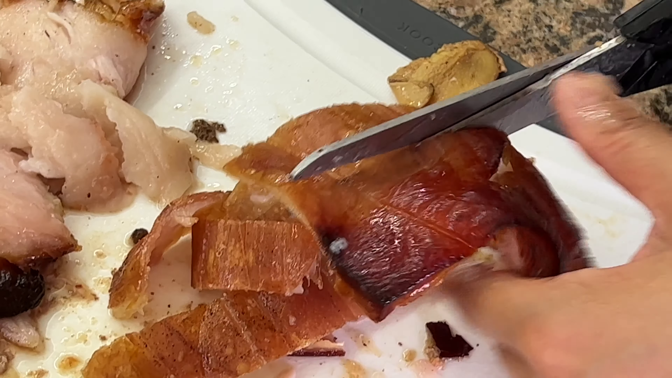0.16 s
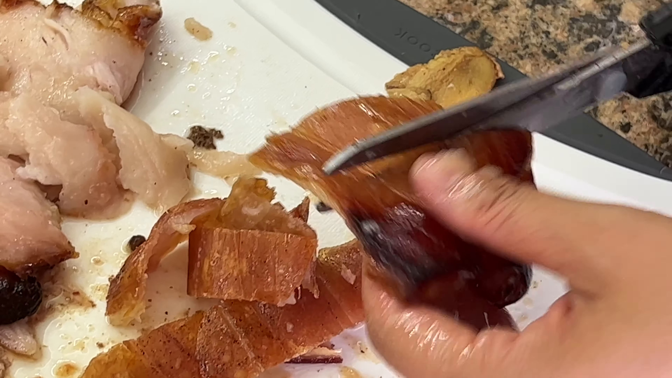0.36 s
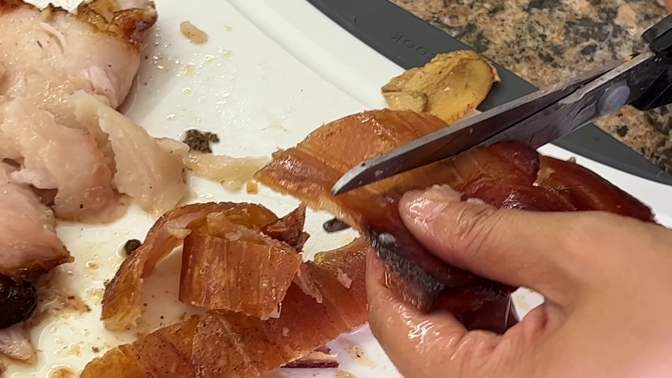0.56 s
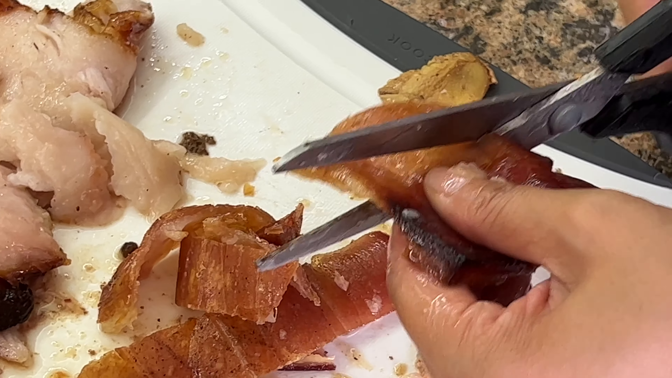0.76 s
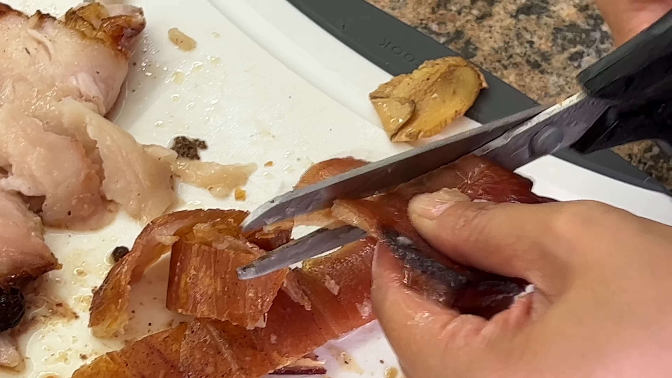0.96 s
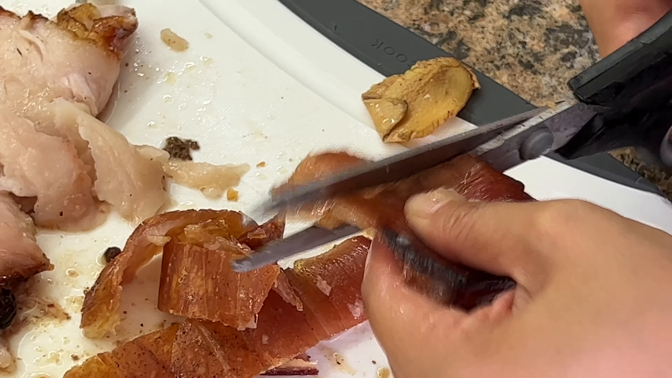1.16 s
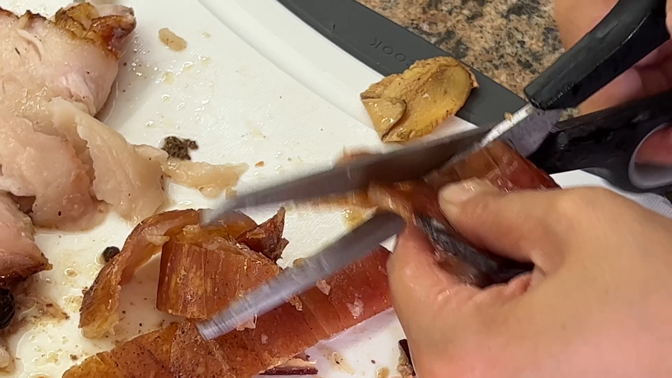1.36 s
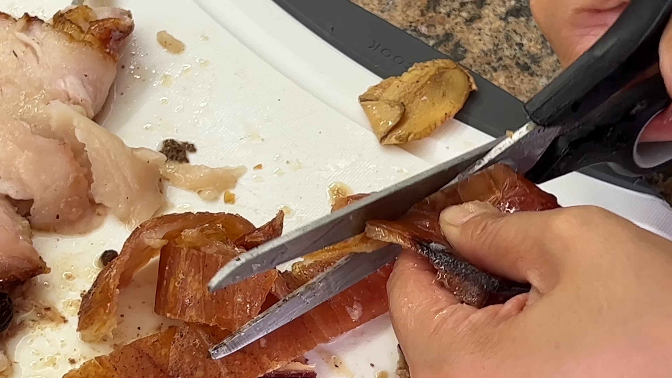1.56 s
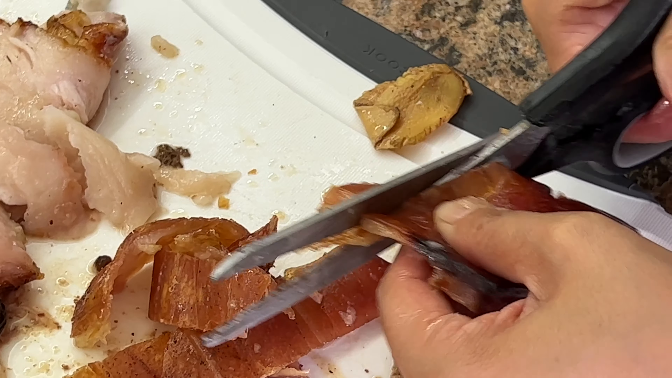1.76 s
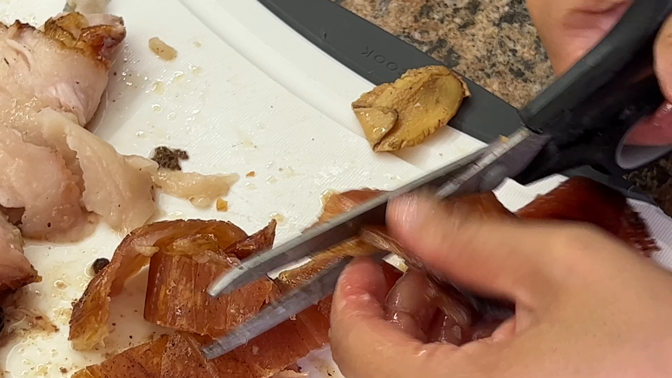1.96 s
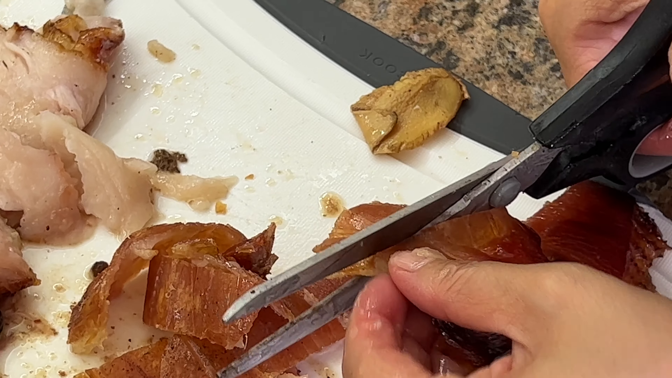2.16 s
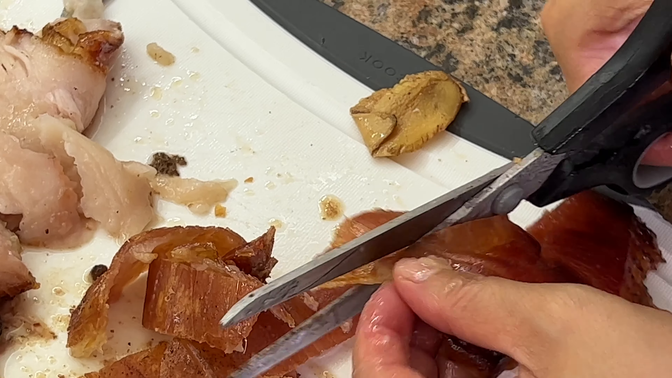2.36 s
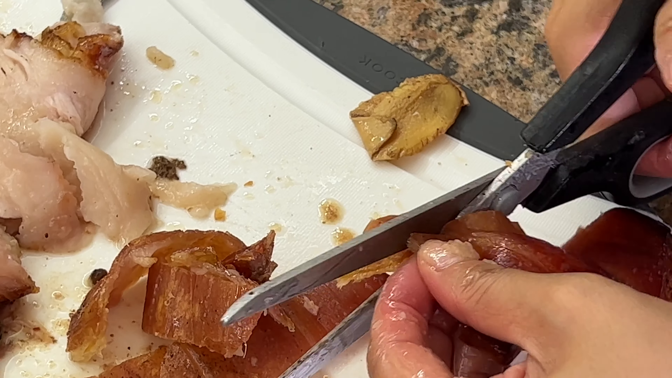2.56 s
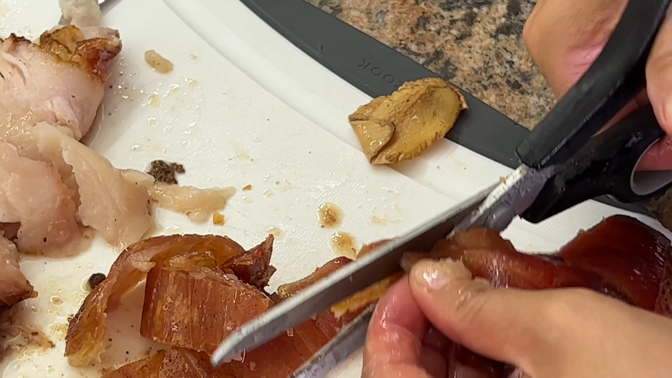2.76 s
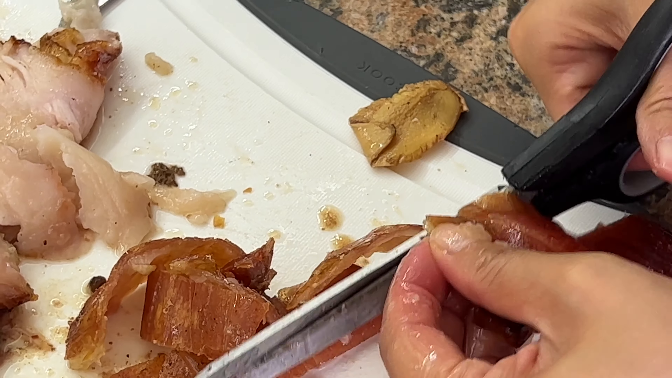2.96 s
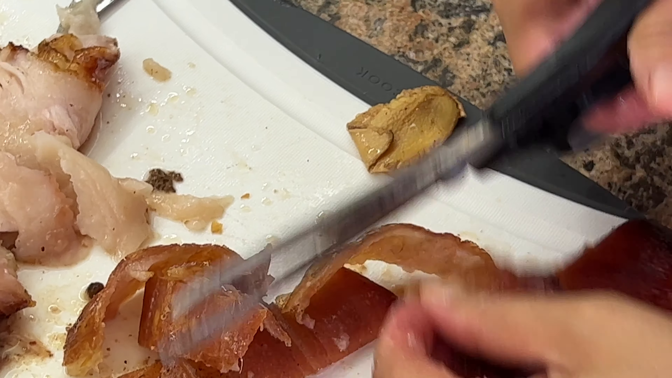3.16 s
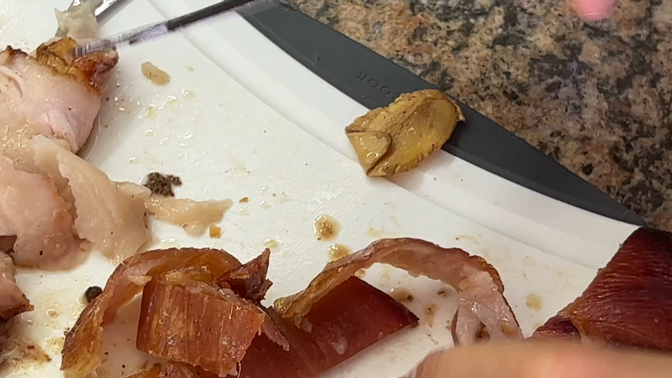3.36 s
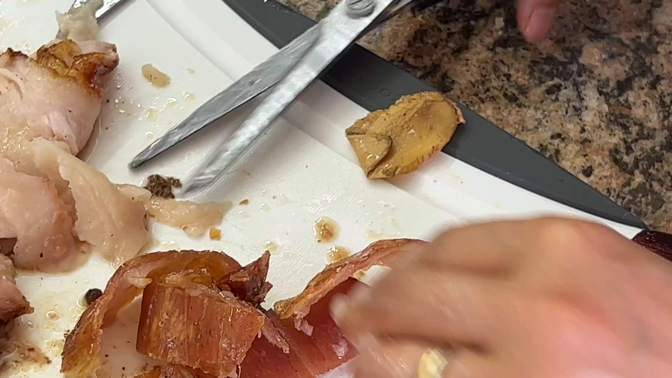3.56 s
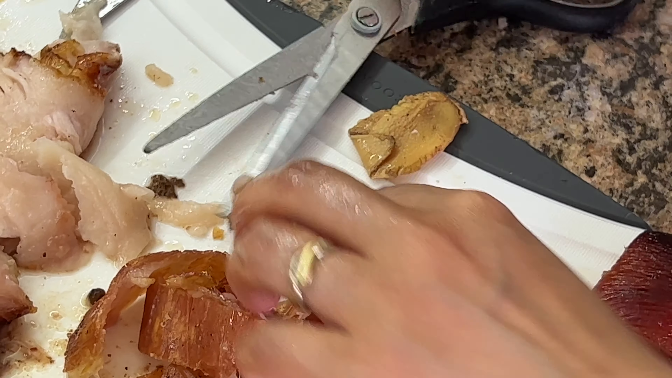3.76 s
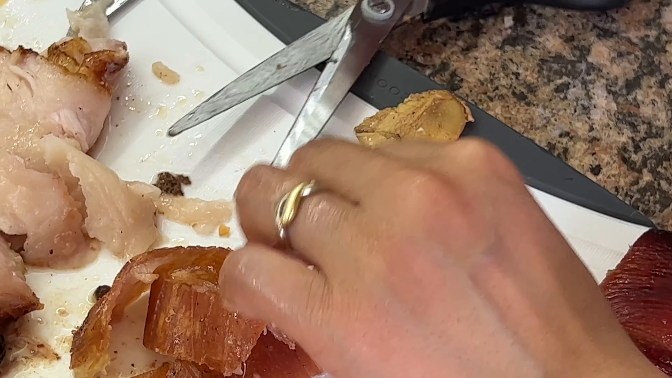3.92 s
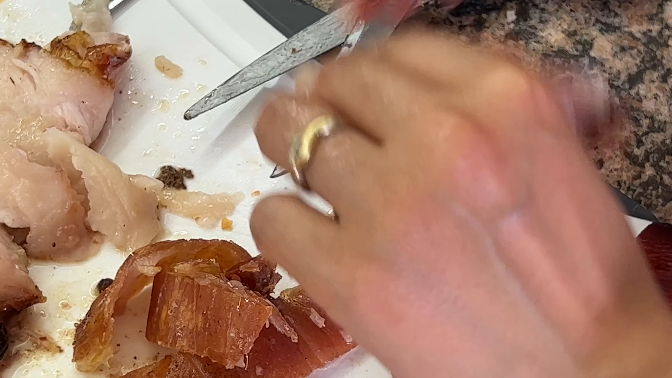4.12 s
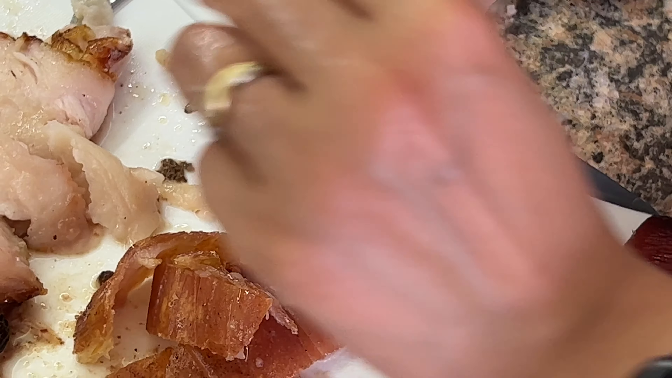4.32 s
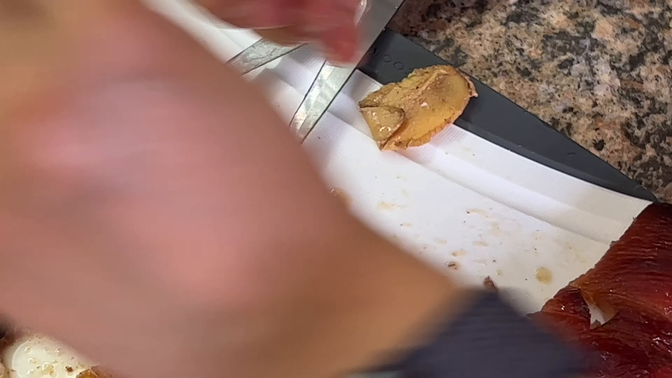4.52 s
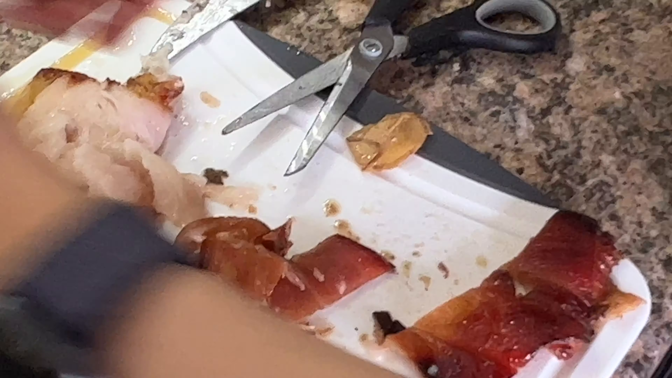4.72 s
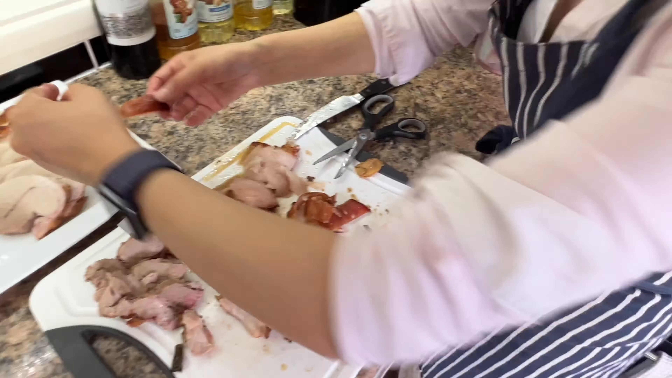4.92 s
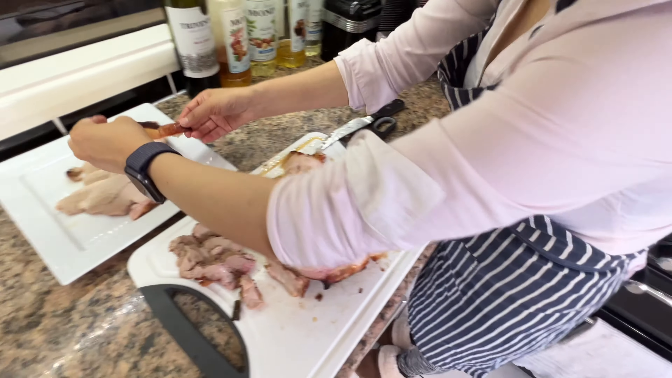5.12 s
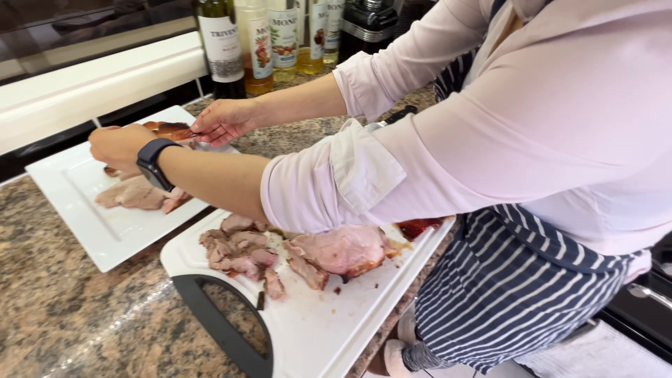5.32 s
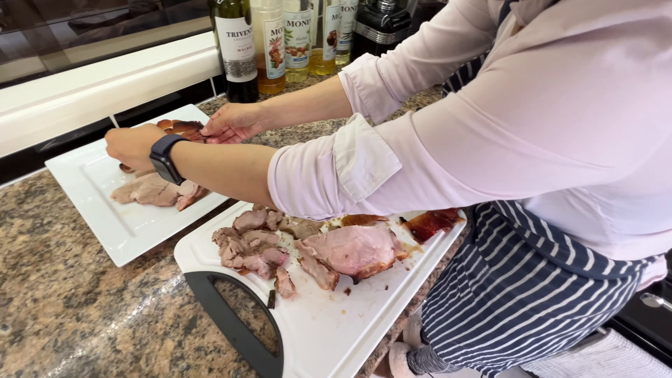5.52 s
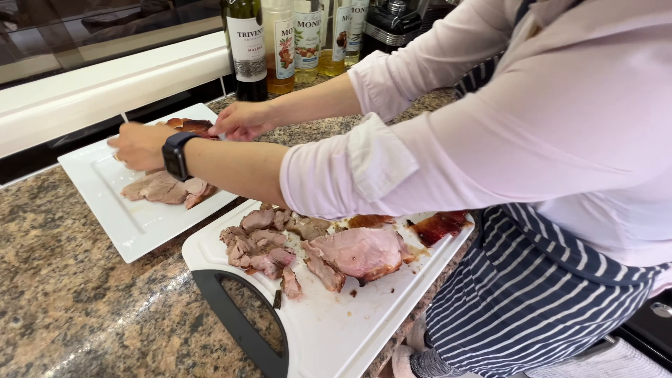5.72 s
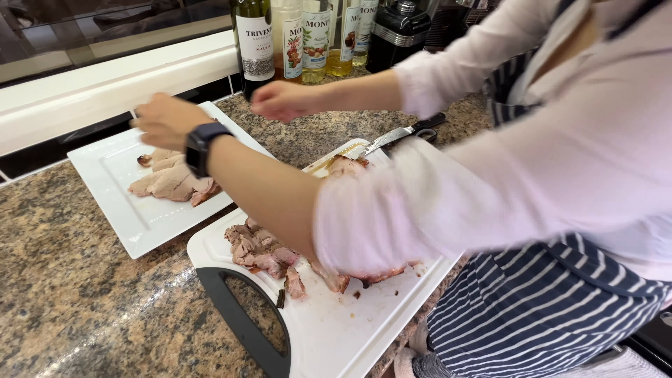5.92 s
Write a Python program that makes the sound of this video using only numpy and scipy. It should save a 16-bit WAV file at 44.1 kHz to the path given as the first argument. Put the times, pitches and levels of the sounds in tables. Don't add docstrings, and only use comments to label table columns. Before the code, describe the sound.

A quiet home kitchen with low room noise, faint appliance hum and light hiss, heard very close. Fingers rustle softly on greasy roasted skin, with faint scuffs from 0 to 0.5 s. A cluster of small dry cracks comes at 0.6 s, then a swelling crackle from 0.83 s breaks into a loud, full crunch at 0.95 s as the blades shut. Lighter snaps and scuffs follow irregularly from 1.2 to 2.6 s, with a clearer crack at 2.66 s. At 2.81 s comes the loudest snap, thin, bright and splintery. Steel scissors tap the plastic board at 3.52 and 3.55 s, handles clack at 3.75 s, and everything falls flat with a rattle and low bump at 3.83 s. Soft rubs and tiny squeaks follow until a dull bump at 4.85 s. From 4.9 s, further back, faint small clicks scatter to the left, clearest at 5.73 s, until about 6 s.

```python
import sys
import numpy as np
from scipy import signal
from scipy.fft import rfft, irfft, next_fast_len
from scipy.io import wavfile
from scipy.ndimage import uniform_filter1d, map_coordinates

SR = 44100
rng = np.random.default_rng(int(sys.argv[2]) if len(sys.argv) > 2 else 0)


def magnitude_from_level(level_db):
    exponent = np.asarray(level_db, float) / 20
    return 10 ** exponent


def bounce(signal):
    frames = np.transpose(np.atleast_2d(signal))
    limited = np.clip(frames, -1, 1)
    pcm = np.round(limited * 32767).astype(np.int16)
    wavfile.write(sys.argv[1], SR, pcm)


N = 268105

# f/Hz, density/dB per Hz
AIR_SPECTRUM = [(18, -30.5), (30, -9), (45, -5.5), (80, -5.5), (257, -10), (467, -19.5), (526, -17),
                (932, -20.5), (1540, -38), (1950, -39.5), (2730, -37), (4000, -53.5), (5200, -52.5),
                (5720, -51), (9000, -59.5), (11700, -93), (19800, -120)]
# f/Hz, likeness
AIR_LIKENESS = [(60, 1), (130, 0.56), (290, 0.8), (640, 0.076), (1410, 0.4), (3100, 1), (6820, 0.94),
                (15000, 0.1397)]
# f/Hz, left minus right/dB
AIR_LEAN = [(60, 6.5), (180, 0.5), (550, 1.5), (1650, 1), (4970, -4.5), (15000, -1)]
# f/Hz, width/Hz, level/dB
HUM = [(58.7, 0.74, -59.5), (48.5, .6, -64), (110.94, 6.6, -61.5), (267.3, 37, -68), (461.6, 29, -72)]
# f/Hz, density/dB per Hz
HISS = [(4000, -12), (6500, -0.5), (9000, 2.5), (12800, -3.5), (13800, -13.5), (15400, -11.5),
        (16300, -20.5)]
# t/s, effort/dB, dryness (-1 greasy, dull .. 1 dry, bright)
RUSTLE = [(0.0, -69, 0.05), (0.22, -76, 0.05), (0.69, -76, 0.05), (0.91, -78.5, 0.05), (1.03, -67, 0.05),
          (1.61, -75.5, 0.05), (2.37, -70.5, 0.05), (2.57, -68.5, 0.05), (2.81, -70.5, 0.05),
          (3.3, -74.5, 0.05), (3.56, -69.5, 0.05), (3.71, -69.5, 0.05), (3.77, -52, 0.05),
          (4.08, -70, 0.05), (4.37, -73.5, 0.05), (4.64, -64.5, 0.05), (5.49, -72.5, 0.05),
          (6.08, -69.5, 0.05)]
# low f/Hz, high f/Hz, level/dB, share of effort followed, dB per unit dryness
RUSTLE_BANDS = [(1110, 4100, -71, 1.3, -9.5), (3000, 6520, -78.5, 1.2, 4), (6000, 12000, -85, 0.4, 7.5),
                (9680, 16000, -88.5, 0.45, 9)]
# start t/s, end t/s
PAUSES = [
    (.74, .81),
    (1.64, 1.73),
    (2.19, 2.28),
    (3.39, 3.46),
]
# t/s, peak level/dB,
# f/Hz, t60/s
SCUFFS = [(0.0, -60.5, 2920, 0.15), (.039, -53, 5500, 0.25), (.404, -57.5, 3100, 0.3),
          (.424, -63, 7000, 0.091), (.51, -67, 4240, 0.14), (1.44, -49, 7700, 0.16),
          (1.556, -58.5, 5160, 0.28), (1.625, -61, 4950, 0.29), (1.74, -57, 7460, 0.19),
          (1.742, -63, 5400, 0.27), (1.845, -62.5, 7300, 0.055), (1.995, -60.5, 3880, 0.3),
          (1.997, -59.5, 6000, 0.42), (2.82, -48, 6600, 0.32), (3.175, -57, 5030, 0.16),
          (3.175, -59.5, 6290, 0.084), (3.194, -58, 2930, 0.85), (4.365, -58, 3650, 0.24),
          (4.39, -63, 6400, 0.024), (4.45, -56.5, 3200, 0.33), (4.58, -60, 4230, 0.31)]
# t/s, peak level/dB, f/Hz, t60/s
RUBS = [(.135, -53.5, 3280, 0.44), (.599, -51, 1946, 0.018), (.615, -56, 5340, 0.22),
        (.65, -49.5, 3740, 0.1), (.69, -58.5, 2894, 0.25), (.834, -45, 6500, 0.12), (.855, -49, 5580, .15),
        (.875, -42, 4500, 0.1), (.895, -52, 4440, 0.4), (1.15, -54, 6900, 0.34), (1.172, -48.5, 2400, 0.34),
        (2.3, -56.5, 4710, 0.2), (2.402, -50.5, 1940, 0.89), (2.44, -54.5, 6200, 0.22),
        (2.635, -64, 6150, 0.034), (3.3, -50.5, 2060, 0.21), (3.872, -26.5, 2220, 0.15),
        (4.41, -53.5, 3000, 0.47), (4.52, -70, 4160, 0.39), (4.62, -71, 2480, 0.47),
        (4.75, -49.5, 1680, 0.055)]
# t/s, peak level/dB, f/Hz, t60/s, thickness as body level below 3.5 kHz/dB
CRACKS = [(.0865, -45, 8800, 0.035, -13), (.6122, -37, 1700, 0.013, 8), (.615, -42.5, 1600, 0.02, -4),
          (.6262, -42.5, 1785, .012, 1), (.6283, -44, 1820, 0.05, -5), (.6393, -38.5, 1708, 0.011, -6),
          (.643, -48.5, 1690, 0.051, -6), (.646, -48.5, 3850, .03, -1), (.667, -48.5, 1787, 0.035, 4),
          (.833, -33, 7000, 0.011, -9), (.8498, -24.5, 6970, 0.028, -5.5), (.8878, -18, 6850, 0.027, -5.5),
          (.891, -26.5, 7000, .04, -20), (1.2143, -35.5, 6800, 0.038, 4.5),
          (1.3314, -35.5, 4850, 0.0055, -6.5), (1.334, -40, 7900, 0.038, -17),
          (1.394, -38.5, 7340, 0.02, 2.5), (1.3999, -34.5, 7600, 0.037, -22), (1.518, -50, 7500, 0.036, -3),
          (1.8135, -49.5, 1720, 0.051, -2.5), (2.0572, -49.5, 5660, 0.088, -1),
          (2.0867, -56, 5450, 0.03, -5), (2.1018, -46, 5400, 0.049, -7), (2.171, -52.5, 5200, 0.052, 0),
          (2.4304, -43.5, 2200, 0.0055, 0), (2.439, -48, 2100, 0.053, -2), (2.5303, -40.5, 6000, 0.0087, 7),
          (2.619, -66.5, 6500, 0.013, -20), (2.63, -63, 6400, 0.017, -16), (2.6625, -30, 5900, 0.02, -9.5),
          (2.7454, -51, 4504, .02, -7), (3.0706, -52, 7460, 0.023, 8), (3.465, -58, 8130, 0.013, -8.5),
          (3.6794, -36.5, 5390, 0.031, -11)]
# t/s, peak level/dB, f/Hz, t60/s, thickness/dB
BITES = [(.857, -32.5, 7550, 0.013, -16), (.867, -35, 6500, 0.0093, -11.5), (.87, -22, 7050, 0.0068, -7.5),
         (.873, -35.5, 7500, .02, -19), (.9437, -14.5, 6000, 0.02, -7), (.9455, -24, 1730, .015, 3.5),
         (.9466, -8.5, 7400, 0.005, 8), (.9474, -14, 7400, .02, -7), (.9495, -17.5, 7430, .035, 5.5),
         (.956, -28.5, 6000, 0.018, -3), (2.6655, -31, 5900, 0.011, -12.5), (2.7765, -51, 6800, 0.02, -22),
         (2.788, -41, 7000, .12, -21.5), (2.789, -47, 4045, 0.012, -9.5), (2.8056, -20, 6750, 0.0081, -21),
         (2.8063, -8.5, 7050, 0.0074, -19.5), (2.8088, -17, 7000, 0.006, -24.5),
         (2.811, -17.5, 7600, .005, -20.5), (2.8118, -1.5, 6400, 0.004, -25),
         (2.8124, -13.5, 11200, .012, -20), (2.8131, -6.5, 6900, 0.004, -24.5),
         (2.8145, -25.5, 2080, 0.026, -8), (2.8152, -9.5, 7900, 0.015, -21.5),
         (2.8165, -16.5, 9100, .01, -19.5), (2.818, -14, 6386, .012, -18.5), (2.888, -36.5, 6600, 0.02, 0),
         (4.851, -49, 1500, 0.018, 7)]
# t/s, peak level/dB, f/Hz, t60/s
FAR_CLICKS = [(4.904, -51, 6000, 0.023), (4.97, -51, 8500, 0.024), (5.053, -47, 6000, 0.024),
              (5.2205, -46, 4500, 0.011), (5.221, -47, 3200, .03), (5.2215, -50, 5590, 0.01),
              (5.226, -53.5, 1400, .12), (5.278, -47, 3436, 0.047), (5.391, -54, 6870, 0.014),
              (5.395, -56, 2260, 0.16), (5.495, -55, 6000, 0.025), (5.654, -54.5, 1703, 0.15),
              (5.689, -59, 4660, 0.024), (5.73, -39.5, 3200, 0.033), (5.731, -45.5, 3810, 0.015),
              (5.737, -50.5, 1250, 0.08), (5.869, -56.5, 4300, 0.16), (5.96, -47.5, 4600, 0.0094),
              (5.98, -46.5, 6000, 0.017), (5.996, -46.5, 6580, 0.036)]
# body level/dB, body slope/dB per octave, fizz level/dB, fizz slope/dB per octave
CRACK_TONE = (1, -3.5, -15.5, 11)
BITE_TONE = (-3, 0, -16, 10.5)
FAR_TONE = (-3, -3, -46, 9)
SCUFF_TONE = (-22.5, -20.5, -25, 0.5)
RUB_TONE = (-0.5, -12, -22.5, 3)
# t/s, peak level/dB, scrape t60/s
SHUTS = [
    (.9468, -24, 0.026),
    (2.8138, -16.5, 0.014),
    (2.825, -31.5, 0.13),
]
# t/s, peak level/dB, scrape t60/s
TIP_KNOCKS = [
    (3.5188, -11, 0.007),
    (3.5215, -21, 0.037),
    (3.5512, -17.5, 0.009),
    (3.554, -27.5, 0.035),
    (3.5645, -41.5, 0.025),
]
HANDLE_KNOCKS = [
    (3.7458, -13.5, 0.019),
    (3.7472, -12, 0.025),
    (3.7492, -22, 0.0043),
    (3.7508, -23.5, 0.024),
    (3.755, -24.5, 0.038),
]
SETTLE_KNOCKS = [
    (3.8256, -10, 0.01),
    (3.8272, -16.5, 0.019),
    (3.8292, -14, 0.016),
    (3.832, -20, 0.071),
    (3.8672, -23, 0.06),
    (3.8705, -44.5, 0.056),
    (3.8800, -38, 0.014),
    (3.912, -45.5, 0.0095),
]
# f/Hz, width/Hz, level/dB
BLADE_MODES = [(704, 230, -19.5), (2000, 230, -6), (3700, 180, -11), (6360, 110, -0.5), (6560, 160, 4),
               (7300, 120, -5), (8060, 310, -4.5)]
TIP_MODES = [(500, 140, -7), (1050, 234, 7), (1600, 770, 1), (2170, 590, 1), (3200, 440, -2.5),
             (4210, 400, -2.5), (5200, 330, -5), (7400, 760, -13), (8370, 470, -10)]
HANDLE_MODES = [(365.4, 36, 12.5), (875, 160, 5.5), (1400, 540, -2.5), (2090, 390, 7), (3000, 290, 3.5),
                (3650, 830, 3.5), (5800, 370, 0), (7230, 1600, -3), (9100, 1400, -6.5), (11200, 280, -16)]
SETTLE_MODES = [(400, 21, 6), (990, 170, 1.5), (1740, 190, 1), (2434, 410, 4.5), (3724, 530, -8.5),
                (5450, 400, 0), (6200, 500, -2), (7400, 960, -4.5), (8580, 800, -13)]
# t/s, peak level/dB, f/Hz, t60/s
THUDS = [(1.22, -34.5, 292, 0.096), (1.222, -31.5, 105, 0.081), (1.251, -40, 136, 0.24),
         (3.526, -34, 125.3, 0.28), (3.528, -39.5, 305, 0.35), (3.553, -35, 122, 0.29),
         (3.681, -34.5, 155, 0.39), (3.71, -38, 99, 1), (3.753, -45, 200, 0.4), (3.853, -28, 341, 0.24),
         (3.856, -26, 129, 0.064), (3.863, -27, 77, 0.17), (3.875, -26.5, 121, 0.17),
         (3.892, -33, 150, 0.051), (3.908, -31.5, 115, 0.33), (3.945, -51, 90, 0.064),
         (4.851, -33.5, 308, 0.12), (4.852, -35.5, 415, 0.079), (4.855, -40.5, 574, 0.16)]
# start t/s, length/s, start f/Hz, end f/Hz, level/dB
SQUEAKS = [(1.23, .096, 5350, 5400, -76), (3.076, .012, 12200, 11950, -70), (3.5, 0.018, 5130, 5170, -69),
           (3.505, .013, 7900, 7600, -71), (4.054, 0.06, 3200, 3200, -73), (4.056, 0.11, 6050, 5950, -78),
           (4.161, 0.063, 2980, 2850, -74), (4.165, .07, 3250, 3250, -77), (4.26, 0.08, 2450, 2400, -77),
           (4.615, 0.103, 6900, 8400, -82), (4.67, 0.043, 11250, 12750, -82), (4.73, .022, 2300, 2400, -69),
           (4.77, 0.057, 9410, 9150, -77), (4.808, 0.086, 13000, 11200, -78)]
# f/Hz, t60/s
WALLS = [(300, 0.46), (1000, 0.43), (3000, .32), (6500, 0.34), (9000, 0.3), (12000, 0.26), (16000, 0.12)]
# f/Hz, left minus right/dB
NEAR_LEAN = [(60, 2), (180, 3), (700, 2.5), (1250, 4), (1900, 1.2), (2600, -.3), (15000, -.3)]
# f/Hz, turns
PORT_SLIP = [(8500, 0), (10200, .5), (12100, 1), (13800, 1.5), (15500, 2)]
# f/Hz, left lead/rad
DIRECT_SKEW = [(700, 0.1), (1250, -.1), (1900, -.25), (2600, .45), (3500, .68), (5000, 0.33), (8000, 0.28),
               (12000, .15)]
# f/Hz, left minus right/dB
FAR_LEAN = [(700, 3), (2600, 5), (5500, 11), (7500, 7), (8500, 0), (9600, -9), (10600, -6), (11500, 0)]
# f/Hz, half width/Hz, level/dB
TREBLE_DIPS = [(10310, 87, -4), (14100, 410, -2), (12580, 1500, -2.5)]

SCENE_CHANGE_S = 4.878
AIR_DB = -57
USUAL_EFFORT_DB, PAUSE_DB, PAUSE_EASE_S = -70, -10.5, 0.027
MIDDLE_HZ = 4000
TIP_FIZZ_DB, HANDLE_FIZZ_DB = -19, -24
THUD_DAMPING = 0.56
BLUR_HZ = 160
SLIP_DWELL = 0.9
SWAY_SAMPLES, SWAY_SPAN = 1.8, 200
SHARED_ABOVE_HZ = 11200
TOP_HZ = 15780


def evened(x):
    return x / np.sqrt(np.mean(x ** 2) + 1e-20)


def read(points, hz):
    f, value = np.transpose(points)
    return np.interp(np.log(hz + 1), np.log(f + 1), value)


def add(mix, s, sound):
    part = mix[round(s * SR):][:len(sound)]
    part += sound[:len(part)]


def resonate(x, hz, width_hz):
    turn = np.exp(2j * np.pi * np.cumsum(hz * np.ones(len(x))) / SR)
    r = np.exp(-np.pi * width_hz / SR)
    return 2 * (turn * signal.lfilter([1 - r], [1, -r], x / turn)).real


def band(x, low_hz, high_hz):
    sos = signal.butter(2, [low_hz, min(high_hz, SR / 2.2)], "band", fs=SR, output="sos")
    return signal.sosfilt(sos, x)


def kitchen_air():
    frames, hz = N // 512 + 5, np.fft.rfftfreq(2048, 1 / SR)
    a, b, c, d = rng.standard_normal((frames, 1025, 4)).T
    same = np.clip(read(AIR_LIKENESS, hz), -1, 1)[:, None]
    left = a + 1j * b
    right = same * left + np.sqrt(1 - same ** 2) * (c + 1j * d)
    level_db = read(AIR_SPECTRUM, hz) + np.outer([.5, -.5], read(AIR_LEAN, hz))
    z = np.array([left, right]) * magnitude_from_level(level_db)[:, :, None]
    air = magnitude_from_level(AIR_DB) * evened(signal.istft(z, nperseg=2048, noverlap=1536)[1][:, :N])
    drive = rng.standard_normal(N + 2 * SR)
    for hum_hz, width_hz, db in HUM:
        hum = resonate(resonate(drive, hum_hz, width_hz), hum_hz, width_hz)[-N:]
        air = air + magnitude_from_level(db) * evened(hum)
    return air


def hiss():
    size = next_fast_len(N)
    shape = magnitude_from_level(read([(20, -60), (2000, -47.5)] + HISS, np.fft.rfftfreq(size, 1 / SR)))
    return evened(irfft(rfft(rng.standard_normal((size, 2)).T) * shape, size)[:, :N])


def rustle():
    s, effort_db, dryness = np.transpose(RUSTLE)
    grains = rng.standard_normal((2, N))
    flutter = evened(uniform_filter1d(rng.standard_normal(N), size=130))
    z = signal.stft(grains * magnitude_from_level(1.3 * flutter), nperseg=256)[2]
    patches = uniform_filter1d(rng.standard_normal(z[0].T.shape), size=24, axis=0)
    patches = uniform_filter1d(patches, size=4, axis=1)
    grains = signal.istft(z * magnitude_from_level(2.8 * evened(patches).T), nperseg=256)[1][:, :N]
    t = np.arange(N) / SR
    push_db = np.interp(t, s, effort_db - USUAL_EFFORT_DB)
    dry = np.interp(t, s, dryness)
    still = np.zeros(N)
    for start, end in PAUSES:
        still += np.clip(np.minimum(t - start, end - t) / PAUSE_EASE_S + 1, 0, 1)
    out = np.zeros((2, N))
    for low_hz, high_hz, db, share, dry_db in RUSTLE_BANDS:
        out += magnitude_from_level(db + share * push_db + dry_db * dry) * evened(band(grains, low_hz, high_hz))
    return magnitude_from_level(PAUSE_DB * still) * out


def splinters(t60, chance, rise_s, first, spiky_db=2.0):
    t = np.arange(len(chance)) / SR
    size = magnitude_from_level(spiky_db * evened(uniform_filter1d(chance[::-1], size=24)))
    spray = chance * size * (1 - np.exp(-t / rise_s)) * magnitude_from_level(-60 * t / t60)
    return spray + first * signal.unit_impulse(len(t), round(rise_s * SR))


def cracks(rows, tone, wide_db, damping, rise_s, body_top_hz, first):
    out = np.zeros((2, N))
    for (s, db, hz, t60, *thick_db), chance in zip(rows, rng.standard_normal((len(rows), 6000))):
        octaves = np.log2(hz / MIDDLE_HZ)
        body_db = tone[0] + tone[1] * octaves + sum(thick_db)
        fizz_db = tone[2] + tone[3] * octaves + 8
        spray = splinters(t60, chance, rise_s, first)
        ring = resonate(resonate(spray, hz, damping * hz), hz, damping * hz)
        snap = evened(ring) + magnitude_from_level(body_db) * evened(band(spray, 1000, body_top_hz))
        snap += magnitude_from_level(wide_db) * evened(band(spray, 3200, 7500))
        snap += magnitude_from_level(fizz_db) * evened(band(spray, 5800, 14000))
        for port, lean_db in zip(out, (.6 * chance[-1], -.6 * chance[-1])):
            add(port, s, magnitude_from_level(db + lean_db) * snap / abs(snap).max())
    return out


def knocks(rows, modes, fizz_db, first):
    out = np.zeros(N)
    for (s, db, t60), chance in zip(rows, rng.standard_normal((len(rows), 4096))):
        blow = splinters(t60, chance, .0006, first)
        ring = np.zeros(len(blow))
        for k, (hz, width_hz, mode_db) in enumerate(modes):
            ring += (-1) ** k * magnitude_from_level(mode_db) * resonate(blow, hz, width_hz)
        body = band(evened(ring) + magnitude_from_level(-9) * evened(band(blow, 490, 10500)), 210, 12600)
        hit = body + magnitude_from_level(fizz_db + 2.5 * (db + 7.5)) * evened(band(blow, 12000, 23000))
        add(out, s, magnitude_from_level(db) * hit / abs(hit).max())
    return out


def thuds():
    out, t = np.zeros(N), np.arange(9000) / SR
    for (s, db, hz, t60), chance in zip(THUDS, rng.standard_normal((len(THUDS), len(t)))):
        push = 3.67 * np.exp(-t / 0.0012) + chance * magnitude_from_level(-60 * t / t60)
        push *= 1 - np.exp(-t / 0.0035)
        ring = band(resonate(push, hz, THUD_DAMPING * hz), 0.5 * hz, 1.67 * hz)
        add(out, s, magnitude_from_level(db) * ring / abs(ring).max())
    return out


def squeaks():
    out = np.zeros(N)
    for start, length, from_hz, to_hz, db in SQUEAKS:
        hz = np.linspace(from_hz, to_hz, round(length * SR))
        drive = rng.standard_normal(9000)[:len(hz)]
        tone = evened(resonate(resonate(drive, hz, BLUR_HZ), hz, BLUR_HZ))
        add(out, start, magnitude_from_level(db) * tone * signal.windows.tukey(len(hz), .4))
    return out


def walls(x, apart=1.4, apart_top_hz=1500):
    taps = np.zeros((2, SR // 2))
    at = np.arange(200, SR // 2 - 20, 10)
    at = at + rng.integers(0, 10, (2, len(at)))
    np.put_along_axis(taps, at, rng.choice([-1., 1.], at.shape), axis=1)
    hz, t, z = signal.stft(taps, SR, nperseg=256)
    same, other = signal.istft(z * magnitude_from_level(-60 * t / read(WALLS, hz)[:, None]), SR, nperseg=256)[1]
    other = band(other, 400, apart_top_hz)
    other = apart * band(band(other, 100, apart_top_hz), 100, apart_top_hz)
    tail = np.array([same + other, same - other]) / np.linalg.norm(same)
    return signal.fftconvolve(np.atleast_2d(x).mean(0)[None], tail, axes=1)[:, :N]


def sway(x):
    wander = uniform_filter1d(rng.standard_normal(N), size=SWAY_SPAN)
    wander = evened(uniform_filter1d(wander, size=SWAY_SPAN))
    at = np.arange(N) + SWAY_SAMPLES * wander
    return np.array([map_coordinates(port, [at], order=2) for port in x])


def near_ports(x, direct):
    size = next_fast_len(N)
    hz = np.fft.rfftfreq(size, 1 / SR)
    slip = 2 * np.pi * read(PORT_SLIP, hz)
    slip -= SLIP_DWELL * np.sin(2 * slip) / 2
    ports = magnitude_from_level(np.outer([.5, -.5], read(NEAR_LEAN, hz))) * np.exp(np.outer([-.5j, .5j], slip))
    skew = np.exp(np.outer([.5j, -.5j], read(DIRECT_SKEW, hz)))
    return irfft((rfft(x, size) + rfft(direct, size) * skew) * ports, size)[:, :N]


def dip(x, hz, width_hz, db):
    size = next_fast_len(N)
    offset = (np.fft.rfftfreq(size, 1 / SR) - hz) / width_hz
    return irfft(rfft(x, size) * magnitude_from_level(db * np.exp(-offset ** 2)), size)[:, :N]


def far_ports(x):
    size = next_fast_len(N)
    hz = np.fft.rfftfreq(size, 1 / SR)
    lean = magnitude_from_level(np.outer([.5, -.5], read(FAR_LEAN, hz))) / (1 + (hz / SHARED_ABOVE_HZ) ** 20)
    return irfft(rfft([np.roll(x[0], 17), x[1]], size) * lean, size)[:, :N]


def scene():
    snaps = cracks(BITES, BITE_TONE, wide_db=-14, damping=.3, rise_s=.00021, body_top_hz=5500, first=1.8)
    snaps += cracks(CRACKS, CRACK_TONE, wide_db=-3, damping=.34, rise_s=.00016, body_top_hz=3500, first=5)
    drags = cracks(SCUFFS, SCUFF_TONE, wide_db=-14.5, damping=.27, rise_s=.0016, body_top_hz=3600, first=0)
    drags += cracks(RUBS, RUB_TONE, wide_db=-11.5, damping=.36, rise_s=.012, body_top_hz=3900, first=0)
    snaps, drags = band(snaps, 780, 19000), band(drags.mean(0), 850, 19000)
    steel = knocks(TIP_KNOCKS, TIP_MODES, TIP_FIZZ_DB, first=2.1)
    steel += knocks(HANDLE_KNOCKS, HANDLE_MODES, HANDLE_FIZZ_DB, first=3.6)
    steel += knocks(SETTLE_KNOCKS, SETTLE_MODES, HANDLE_FIZZ_DB, first=6.3)
    steel += knocks(SHUTS, BLADE_MODES, HANDLE_FIZZ_DB, first=9)
    far = cracks(FAR_CLICKS, FAR_TONE, wide_db=-15, damping=.23, rise_s=.00028, body_top_hz=1640, first=7)
    far = band(band(far, 880, 9300), 560, 10400)
    bumps = thuds()
    hands, diffuse = rustle() + squeaks()
    airy = hiss()
    second_scene = np.arange(N) > SCENE_CHANGE_S * SR

    shared_hiss = band(band(airy[0], SHARED_ABOVE_HZ, 18000), SHARED_ABOVE_HZ, 18000)
    soft = drags + bumps + (hands + magnitude_from_level(-91) * airy[0]) * ~second_scene + magnitude_from_level(-75.5) * shared_hiss * second_scene
    tail = sway(magnitude_from_level(-14) * walls(snaps + drags) + magnitude_from_level(-12.5) * walls(steel + bumps))
    near = near_ports(soft + tail, snaps + steel)
    far_tail = magnitude_from_level(-6) * sway(walls(far, apart=1.28, apart_top_hz=7000))
    far_hands = np.array([hands, 0.15 * hands + diffuse]) * second_scene
    back = far_ports(far + far_tail + far_hands + magnitude_from_level(-78) * airy * second_scene)
    air = kitchen_air()
    return dip(near, *TREBLE_DIPS[0]) + back + air + magnitude_from_level(-9) * band(air, 330, 2700) * second_scene


def band_limit(x):
    return signal.sosfilt(signal.butter(12, 16800, fs=SR, output="sos"), x)


def record(dry):
    bass_cut = signal.butter(6, 41, "high", fs=SR, output="sos")
    top_cut = signal.ellip(6, .5, 24, TOP_HZ, fs=SR, output="sos")
    notched = dip(dip(dry, *TREBLE_DIPS[1]), *TREBLE_DIPS[2])
    return band_limit(signal.sosfilt(np.vstack([bass_cut, top_cut]), notched))


dry = scene()
out = record(dry)
bounce(out)
```